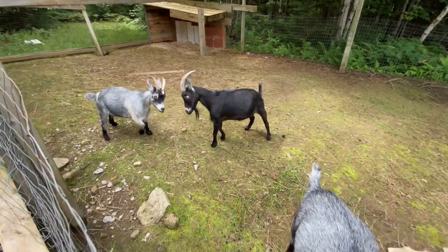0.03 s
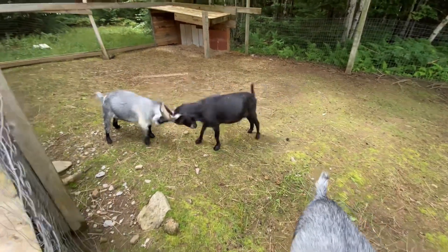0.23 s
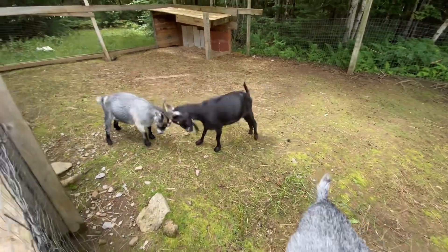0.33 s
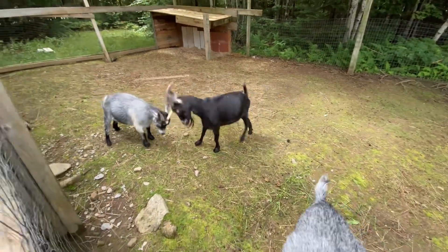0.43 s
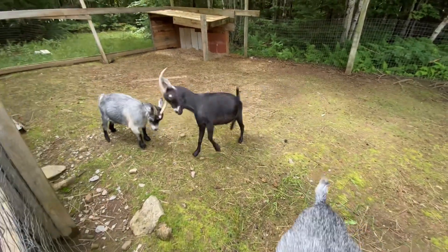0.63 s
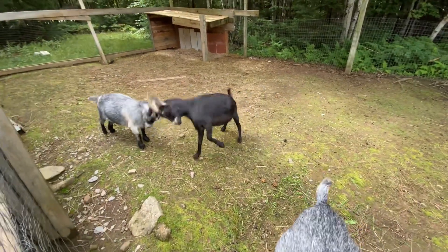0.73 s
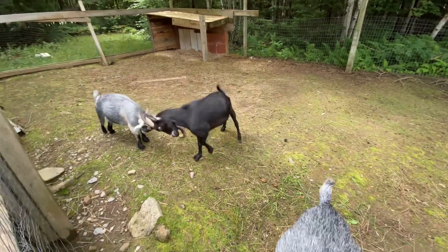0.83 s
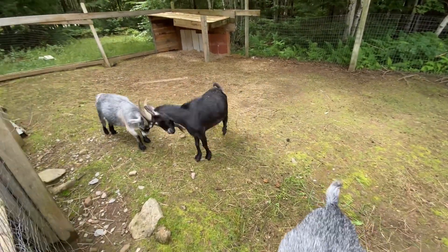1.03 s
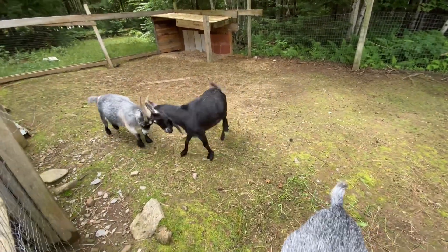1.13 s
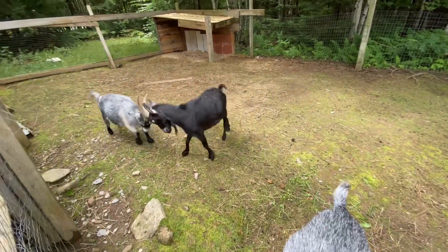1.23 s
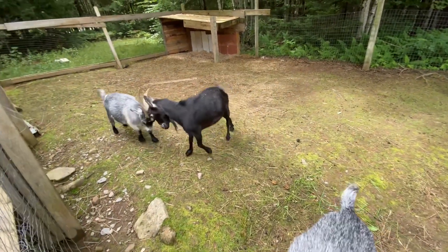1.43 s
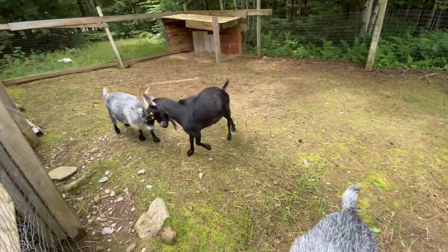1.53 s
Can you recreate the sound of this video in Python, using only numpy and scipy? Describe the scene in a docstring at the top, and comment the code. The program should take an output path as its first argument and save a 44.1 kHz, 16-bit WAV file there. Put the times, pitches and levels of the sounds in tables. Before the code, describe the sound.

Goat horns clash in a quick burst of sharp knocks, meet again, then knock more lightly, each with a faint outdoor echo. Hooves stamp and scuff the earth a little to the left, over quiet air and thin insect chirps.

```python
"""Insects buzz over quiet air in an earth pen by a wood, and dry stalks crackle underfoot.
Almost at once two goats, a little to the left, knock horns in a quick cluster: each blow is a hard
click with a short hollow ring and a faint echo from the trees. Hooves thud and scuff, and a far
insect starts to chirp. The horns meet again at 0.7 s, a hoof drags through the dirt, and after a
lighter knock at 1.1 s a faint far tone comes up."""
import sys
import numpy as np
from scipy import signal
from scipy.fft import rfft, irfft
from scipy.io import wavfile
from scipy.ndimage import uniform_filter1d

SR = 44100
rng = np.random.default_rng(int(sys.argv[2]) if len(sys.argv) > 2 else 0)


def generate_wav(signal):
    """Clip the signal to [-1, 1] and save it as 16-bit WAV at the path in sys.argv[1]."""
    frames = np.transpose(np.atleast_2d(signal))
    scaled = np.clip(frames, -1, 1) * 32767
    pcm = np.round(scaled).astype(np.int16)
    wavfile.write(sys.argv[1], SR, pcm)


N = 70560
T = np.arange(N) / SR
FREQ = np.maximum(np.fft.rfftfreq(2 * N, 1 / SR), 1)

# which side the wood and the background are heard from: f/Hz, left minus right/dB
SURROUND_BALANCE = [(100, -1), (700, 0), (1500, 1), (3000, 2), (4500, -8), (7000, -6.5), (10000, -0.5),
                    (14000, -3.5)]


def amp(db):
    """Turn decibels into a number to multiply by."""
    return 10 ** (np.asarray(db) / 20)


def curve(points):
    """Join (f/Hz, value) points into a line over all frequencies."""
    hz, values = np.array(points, float).T
    return np.interp(np.log(FREQ), np.log(hz), values)


def timeline(points):
    """Join (t/s, value) points into a line over time."""
    return np.interp(T, *np.array(points).T)


def colour(x, db):
    """Turn each frequency up or down by its dB, without smearing sound back in time."""
    cepstrum = irfft(np.log(amp(db)))
    cepstrum[1:N] *= 2
    cepstrum[N + 1:] = 0
    return irfft(rfft(x, 2 * N) * np.exp(rfft(cepstrum)))[..., :N]


def band(hz, width_hz):
    """Noise around one pitch, with a typical size of 1."""
    spectrum = rfft(rng.standard_normal(2 * N))
    x = irfft(spectrum / (1 + ((FREQ - hz * hz / FREQ) / width_hz) ** 2))[:N]
    return x / x.std()


def wander(per_s):
    """Glide between random values, roughly 1 in size."""
    hold = int(SR / per_s)
    steps = np.repeat(rng.standard_normal(N // hold + 1), hold)
    return np.sqrt(2) * uniform_filter1d(steps, hold)[:N]


def fade(start, rise, t60):
    """Swell, then die away; t60 is the time in seconds to fall by 60 dB."""
    age = np.maximum(T - start, 0)
    return (1 - np.exp(-age / max(rise, 1e-5))) * np.exp(-np.log(1000) * age / t60)


def echoes(x, rise, t60):
    """A wash of many tiny echoes, different at each ear."""
    tail = rng.standard_normal((2, N)) * fade(0, rise, t60)
    tail /= np.sqrt(np.sum(tail ** 2, axis=1, keepdims=True))
    return signal.fftconvolve(np.atleast_2d(x), tail, axes=1)[:, :N]


def lean(x, balance):
    """Make one ear louder than the other, frequency by frequency."""
    left, right = np.broadcast_to(x, (2, N))
    half_db = curve(balance) / 2
    return np.array([colour(left, half_db), colour(right, -half_db)])


def at_goats(x):
    """The goats stand to the left, so the right ear hears them later and weaker."""
    # louder on the left: f/Hz, left minus right/dB
    balance = [(100, .5), (400, 6), (800, 7), (1500, 4), (3000, 4), (4500, 4), (7000, 0), (12000, 1.5)]
    # how far the right ear's wave trails: f/Hz, lag/rad
    lag = [(20, 0.5), (120, -0.05), (500, 0.75), (2070, 1.26), (4570, 1.85), (5600, 3), (6460, 3.95),
           (6800, 0.96), (8010, 4.5), (9300, 4.5), (11300, 5.5), (13300, 7.5), (14400, 10), (16000, 8)]
    left, right = lean(x, balance)
    late_right = irfft(rfft(right, 2 * N) * np.exp(-1j * curve(lag)))[:N]
    return np.array([left, late_right])


def air():
    """Low rumble, the hiss of distant insects and, near the end, a faint far tone."""
    # shape of the rumble and hiss: f/Hz, relative level/dB
    shape = [(25, -83.5), (60, -49.5), (120, -59.5), (250, -65), (600, -69), (1400, -70.5), (3000, -72.5),
             (4500, -74), (6000, -69.5), (7200, -70.5), (8400, -71), (9500, -78.5), (13000, -95),
             (14500, -112), (16000, -105)]
    # stereo width: f/Hz, side minus middle/dB
    width = [(50, -4), (200, -4), (800, 0.5), (6000, 1.5), (14000, 1.5)]
    # swell of the far tone: t/s, level/dB
    far_swell = [(0, -106), (1.1, -100), (1.23, -65), (1.33, -72), (1.42, -67), (1.6, -74.5)]
    middle, side = colour(rng.standard_normal((2, N)), curve(shape) + 8.5)
    side = colour(side, curve(width))
    waver_db = 3.5 * wander(per_s=17.13)
    bed = np.array([middle + side, middle - side]) * amp(waver_db)
    far_tone = np.array([band(hz=1383, width_hz=150) for _ in range(2)])
    return bed + far_tone * amp(timeline(far_swell))


def insect_buzz():
    """A thin buzz: evenly spaced high tones waver in pitch together, and each swells and fades."""
    # one row per tone, lowest first: early level/dB, late level/dB
    tones = [(-86, -78), (-73.5, -77.5), (-79, -80), (-75, -71), (-80, -71), (-72.5, -73), (-77, -71.5),
             (-79, -78), (-85, -82), (-79, -77), (-85, -83)]
    # glide from early to late levels: start t/s, end t/s
    glide = [.4, .9]
    lowest_hz, spacing_hz, jitter_hz, waver_db = 5285, 364.6, 3, 2
    out = np.zeros((2, N))
    drift = np.cumsum(jitter_hz * wander(per_s=30.5)) / SR
    for k, levels in enumerate(tones):
        db = np.interp(T, glide, levels)
        cycles = (lowest_hz + k * spacing_hz) * T + drift
        for ear in out:
            gain = np.sqrt(2) * amp(db + waver_db * wander(per_s=2.85))
            offset = .55 * rng.random()  # the tones stay partly in step, so the buzz pulses
            ear += gain * np.sin(2 * np.pi * (cycles + offset))
    return out


def stalk_rustle():
    """Dry stalks give a soft high rustle as the goats shift their feet."""
    # swell of the rustle: t/s, level/dB
    swell = [(0, -78), (.47, -78), (.53, -69.5), (.68, -73.5), (1.0, -78), (1.3, -80), (1.6, -99)]
    return band(hz=10800, width_hz=4400) * amp(timeline(swell) + 1.8 * wander(per_s=150))


def dry_litter():
    """Hooves scuff through dry stalks and grit, over a thin crackle."""
    # hoof scuffs: t/s, level/dB, centre f/Hz, t60/s
    scuffs = [(0.154, -42.5, 1080, 0.073), (0.301, -60, 2480, 0.054), (0.346, -53, 1476, 0.063),
              (0.477, -52, 725, 0.026), (0.57, -73, 1200, 0.014), (0.752, -43.5, 1820, 0.061),
              (0.985, -58.5, 8300, 0.12), (1.087, -58, 1000, 0.052), (1.233, -63.5, 790, 0.18)]
    snaps_per_s, spread_db, crackle_db = 94, 3.5, -72.5
    scuffing = np.zeros((2, N))
    for start, db, hz, t60 in scuffs:
        scuffing += amp(db) * fade(start, 0.00021, t60) * band(hz, 1.54 * hz)
    snaps = rng.random((2, N)) < snaps_per_s / SR
    strength = amp(spread_db * rng.exponential(size=(2, N)).clip(0, 3))
    grain = band(hz=7000, width_hz=7000) * fade(0, rise=.0001, t60=0.012)
    crackle = signal.fftconvolve(snaps * strength, grain[None], axes=1)[:, :N]
    return at_goats(scuffing) + amp(crackle_db) * crackle / crackle.std()


def stalk_snaps():
    """A stalk breaks underfoot with one sharp click and splinters for a moment."""
    # breaking stalks: t/s, relative level/dB, f/Hz
    snaps = [(.01, -52, 5460), (.4752, -42.5, 3100), (0.5088, -42, 5560), (.5192, -53, 8000),
             (.5323, -44.5, 8400), (0.692, -47, 3000), (1.03, -47, 4970), (1.31, -50, 4000),
             (1.3160, -42, 5400), (1.3256, -47, 5000)]
    out = np.zeros(N)
    for start, db, hz in snaps:
        click = amp(6) * fade(start, rise=0, t60=.0012) * np.sin(2 * np.pi * hz * (T - start))
        splinters = amp(-6) * fade(start, rise=0, t60=.01) * band(hz, 2 * hz)
        out += amp(db) * (click + splinters)
    return out


def ring(notes, pitch, length):
    """Struck horn or bone rings with fading notes; horns that stay pressed together ring shorter."""
    t = T[:N // 8]
    out = np.zeros(N)
    for k, (hz, db, t60) in enumerate(notes):
        decay = np.exp(-np.log(1000) * t / (t60 * length))
        out[:len(t)] += (-1) ** k * amp(db) * np.sin(2 * np.pi * hz * pitch * t) * decay
    return out


def horn_blows():
    """Each blow clicks and rings skull and horns; where they meet sets the tone. Pen and wood echo."""
    # blows: t/s, level/dB, skull/dB, horn bases/dB, horn shafts/dB, pitch ratio, ring length ratio,
    # grinding/dB, hollow note f/Hz, its boost/dB, echo/dB, then one boost/dB for each of tone_hz
    blows = [(0.125, -1.5, -6.5, -14, -19, 0.98, 0.78, -5.5, 1320, 3.2, 1.5, 5, -1, 4, 1.5, -2.5, -14.5),
             (0.1621, 2, -3, -6, -27, 0.92, 0.63, -1, 2710, 5.3, 0.5, -2, -1.5, -2.5, 2, -6, -20.5),
             (0.178, -9, -11, -4.5, -35, 1.05, 0.91, 1, 1520, 8.4, -3.5, 1, -5, 5.5, -0.5, -1.5, -8.5),
             (0.205, -20.5, -20, -28, -19, 0.64, 1.1, -1.5, 2200, 2, -8, -26, -6, -0.5, 7.5, -14, -8),
             (0.7171, -6.5, -16, -10, 3, 0.995, 0.75, -0.5, 1760, 3.3, 0, -11, -1, -3, 3, 0, 5.5),
             (1.1417, -18.5, -15, 0.5, -33, 0.901, 0.96, -8, 1280, 8.5, 1.5, 0, 0.5, 0, -16.5, -18, -13)]
    # where a blow's tone is set: f/Hz
    tone_hz = [400, 850, 1600, 3300, 6500, 11000]
    # notes of the skull, thick horn bases and slim shafts, before each blow scales them:
    # f/Hz, level/dB, t60/s
    skull = [(394, -7.5, 0.03), (542, -5, 0.028)]
    bases = [(800, -4.5, 0.026), (978, -8, 0.021), (1347, 1.5, 0.014), (1517, 2, 0.01), (2188, -3.5, 0.037),
             (2540, -2.5, 0.023), (3470, -31, 0.012), (4730, -1, 0.017), (6560, -23, 0.012)]
    shafts = [(713, -4.5, 0.082), (1090, -16, 0.11), (1505, -5, 0.047), (1755, -4, 0.049),
              (2120, -8, 0.044), (2970, -9.5, 0.049), (3390, 2.5, 0.018), (4710, -5, 0.01),
              (7430, 1, 0.0065), (9200, -5, 0.013)]
    # tone of the click, the close echoes and the pen and wood echoes: f/Hz, relative level/dB
    click_shape = [(150, -80), (500, -2), (1200, 2.5), (3000, 0.5), (4200, -4.5), (7000, -2), (12000, -13),
                   (16000, -19.5)]
    close_shape = [(200, 6), (3000, 0), (6000, -2), (12000, -1.5)]
    far_shape = [(100, -1.5), (500, 0), (1500, 0.5), (3000, -1.5), (7000, -7), (14000, -21)]
    ring_db, hollow_width_hz = -21.5, 132
    click = amp(2) * colour(signal.unit_impulse(N), curve(click_shape))
    direct, far, close = np.zeros(N), np.zeros(N), np.zeros((2, N))
    for (start, db, skull_db, base_db, shaft_db, pitch, length,
         grind_db, hollow_hz, hollow_db, echo_db, *tone_db) in blows:
        parts = [(skull_db, skull), (base_db, bases), (shaft_db, shafts)]
        ringing = sum(amp(part_db) * ring(notes, pitch, length) for part_db, notes in parts)
        # the horn's wall adds a hollow note right where it is hit
        hollow = hollow_db / (1 + ((FREQ - hollow_hz) / hollow_width_hz) ** 2)
        tone = curve(list(zip(tone_hz, tone_db))) + hollow
        # the horns' ridges grind past each other
        grinding = amp(grind_db) * echoes(click, rise=0.00042, t60=0.011)[0]
        blow = amp(db) * colour(click + grinding + amp(ring_db) * ringing, tone)
        i = int(start * SR)
        direct[i:] += blow[:N - i]
        far[i:] += amp(echo_db) * blow[:N - i]
        close[:, i:] += echoes(blow, rise=0.00043, t60=0.026)[:, :N - i]
    bounce = amp(-5) * colour(at_goats(close), curve(close_shape))  # off the ground and the bodies
    pen = amp(-12) * echoes(far, rise=0.0037, t60=0.2)
    wood = amp(-19) * echoes(far, rise=0.15, t60=0.5)
    tail = colour(pen + lean(wood, SURROUND_BALANCE), curve(far_shape))
    return at_goats(direct) + bounce + tail


def hoof_thuds():
    """The earth booms briefly under each stamp, with a little dull grit."""
    # hooves and weight landing: t/s, level/dB, f/Hz, rise/s, t60/s
    thuds = [(0.125, -38.5, 145, 0.0084, 0.12), (0.1715, -18, 78.6, 0.011, 0.096),
             (0.212, -45.5, 197, 0.0046, 0.12), (.272, -39.5, 122, 0.018, 0.12),
             (.305, -45, 170.6, 0.0026, 0.079), (0.314, -48.5, 72, 0.0025, 0.22),
             (.476, -40.5, 313, 0.0017, 0.026), (0.484, -49, 60.3, 0.0027, 0.076),
             (0.6921, -37, 423, 0.0027, 0.038), (0.696, -31, 182, 0.0033, 0.044),
             (0.733, -37.5, 180, 0.0024, 0.1), (0.787, -39.5, 108, 0.0016, 0.22),
             (0.831, -41.5, 73.8, 0.02, 0.42), (1.07, -53, 158, 0.0054, 0.11),
             (1.103, -39, 95.4, 0.0098, 0.08), (1.148, -39.5, 149.5, 0.0025, 0.049),
             (1.397, -62.5, 66.6, 0.039, 0.89), (1.538, -56.5, 340, 0.0063, 0.061),
             (1.568, -47, 134, 0.018, 0.1)]
    out = np.zeros(N)
    grit = amp(-14.5) * band(hz=138, width_hz=138)
    for start, db, hz, rise, t60 in thuds:
        boom = np.sin(2 * np.pi * hz * (T - start))
        out += amp(db) * fade(start, rise, t60) * (boom + grit)
    return at_goats(out)


def insect_chirps():
    """A far insect rasps in short, high swells."""
    # chirps: middle t/s, level/dB
    chirps = [(0.421, -66.5), (.95, -69), (1.2, -71), (1.46, -62)]
    half_length_s = .04
    swell = sum(amp(db) * np.exp(-((T - middle) / half_length_s) ** 2) for middle, db in chirps)
    return swell * np.array([band(hz=8200, width_hz=500) for _ in range(2)])


def hoof_drag():
    """A hoof scrapes through the dirt as the goats push against each other."""
    level_db, rough_db = -52, 2
    grain = amp(level_db + rough_db * wander(per_s=121.85))
    scrape = band(hz=1550, width_hz=1550) * grain
    return at_goats(scrape * fade(start=0.802, rise=0.028, t60=0.34))


def scene():
    """The goats over the outdoor background, whose insects are mostly on the right."""
    # gentle rise and fall of the background: t/s, level/dB
    swell = [(0, -4), (.4, -0.5), (.65, 3.5), (1.0, 0), (1.35, 0.5), (1.6, -3)]
    background = (air() + insect_buzz() + insect_chirps()) * amp(timeline(swell))
    goats = horn_blows() + hoof_thuds() + dry_litter() + stalk_snaps() + hoof_drag() + stalk_rustle()
    return goats + lean(background, SURROUND_BALANCE)


def record(dry):
    """Thin the deepest bass, soften the highest treble and cut off what lies above it."""
    low_cut_hz, soften_hz, top_hz = 13, 14300, 15800
    x = signal.sosfilt(signal.butter(2, low_cut_hz, "high", fs=SR, output="sos"), dry)
    x = signal.sosfilt(signal.butter(6, soften_hz, fs=SR, output="sos"), x)
    return signal.sosfilt(signal.ellip(8, .2, 70, top_hz, fs=SR, output="sos"), x)


dry = scene()
out = record(dry)
generate_wav(out)
```